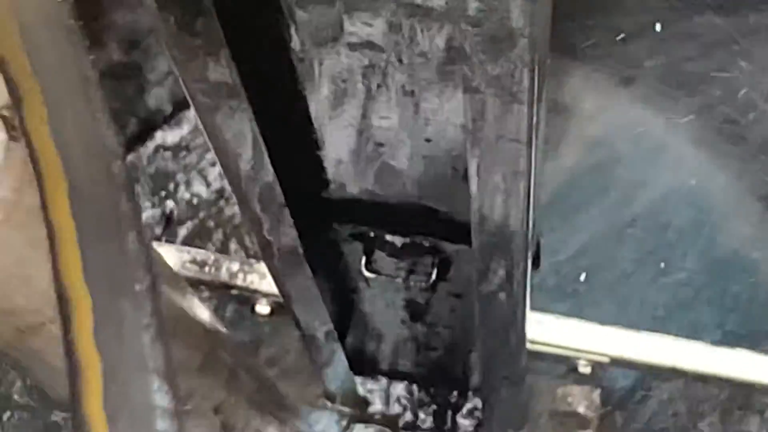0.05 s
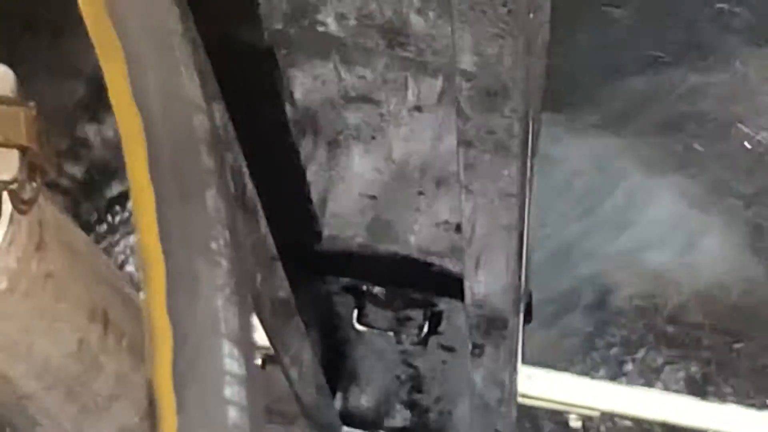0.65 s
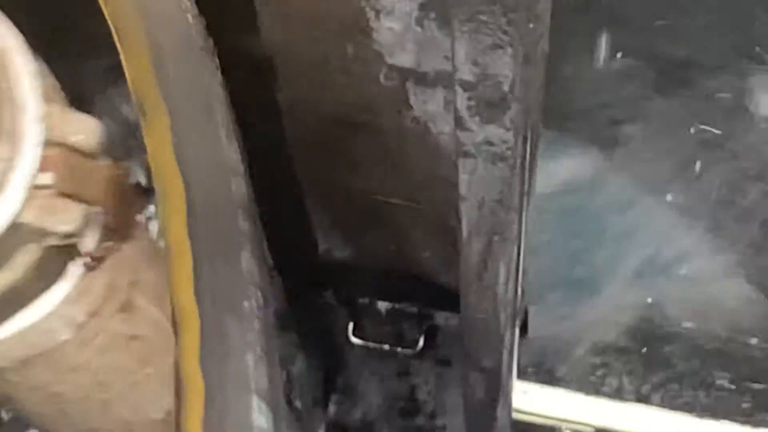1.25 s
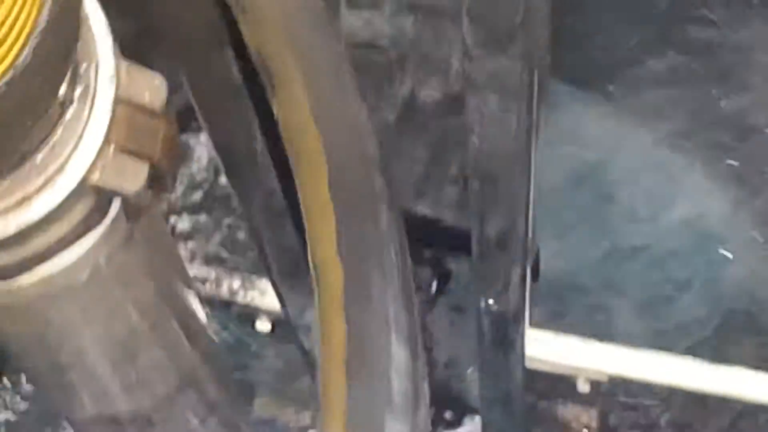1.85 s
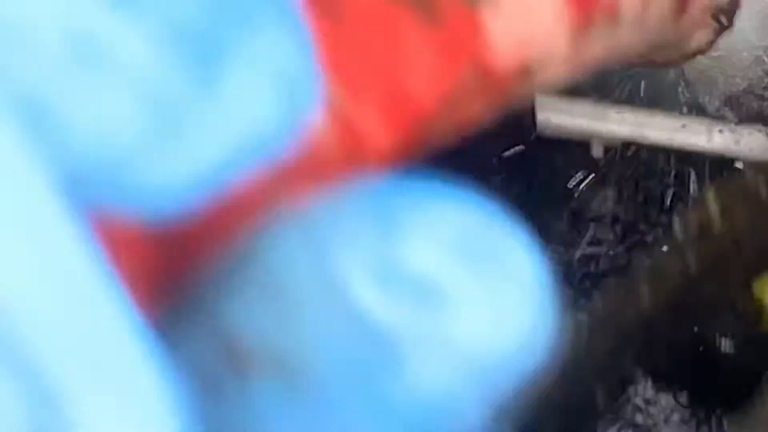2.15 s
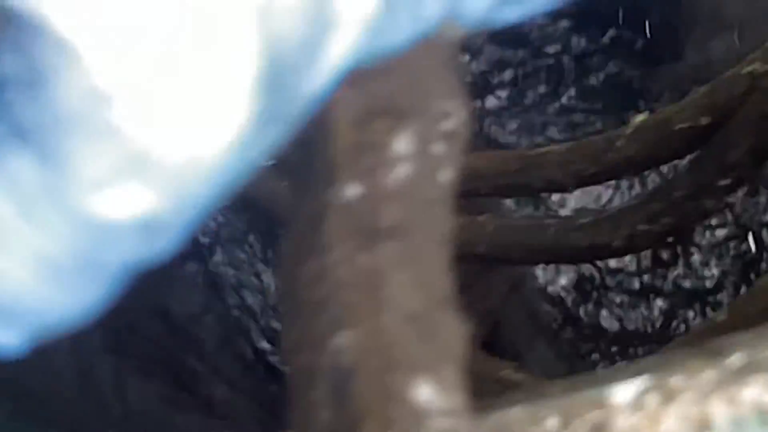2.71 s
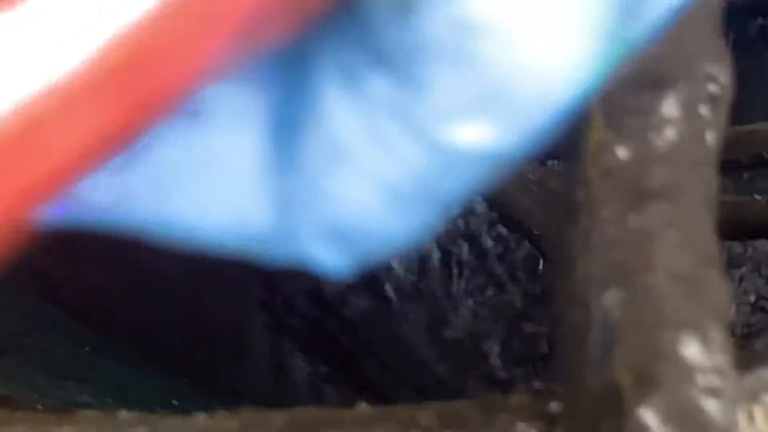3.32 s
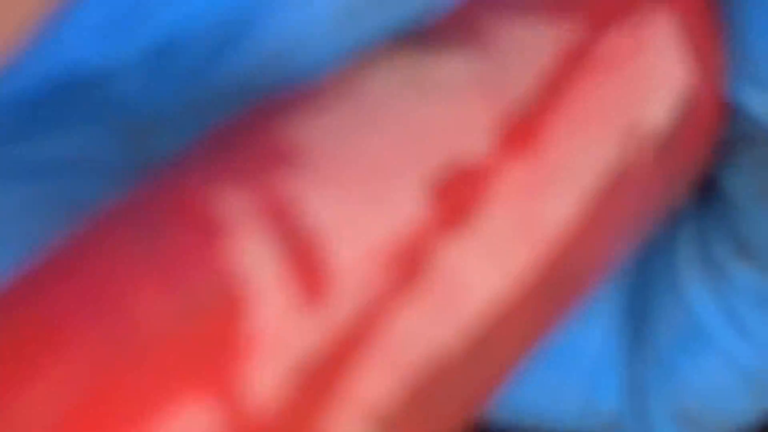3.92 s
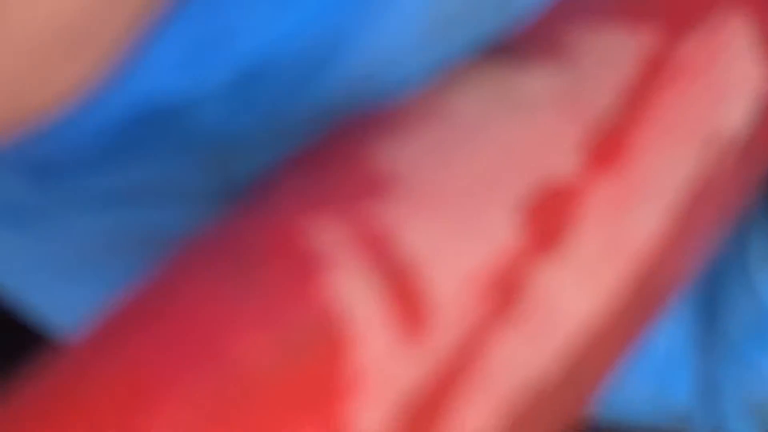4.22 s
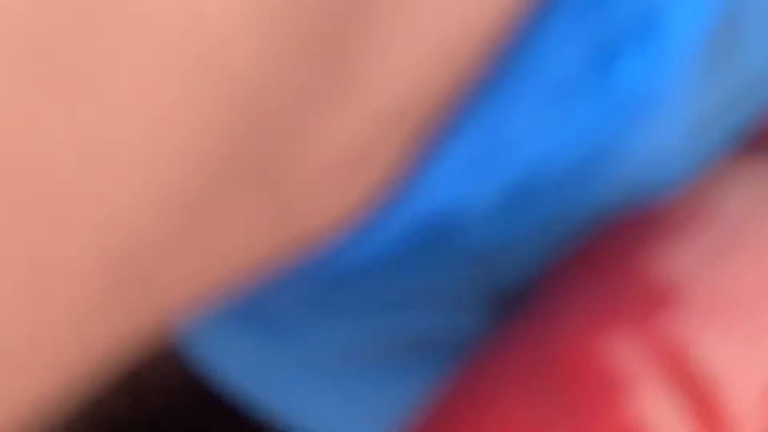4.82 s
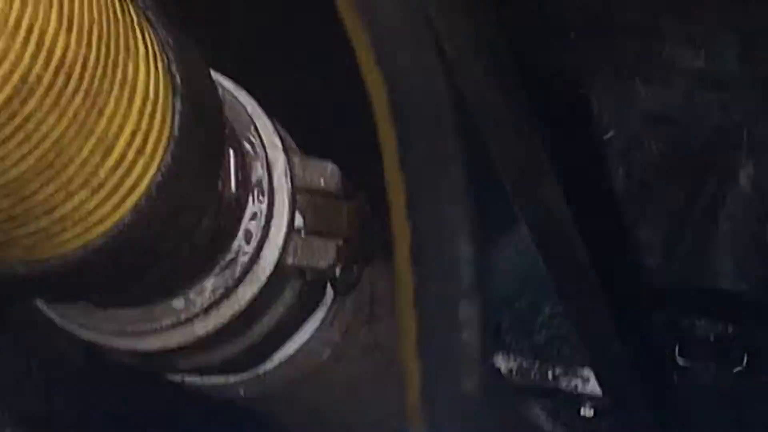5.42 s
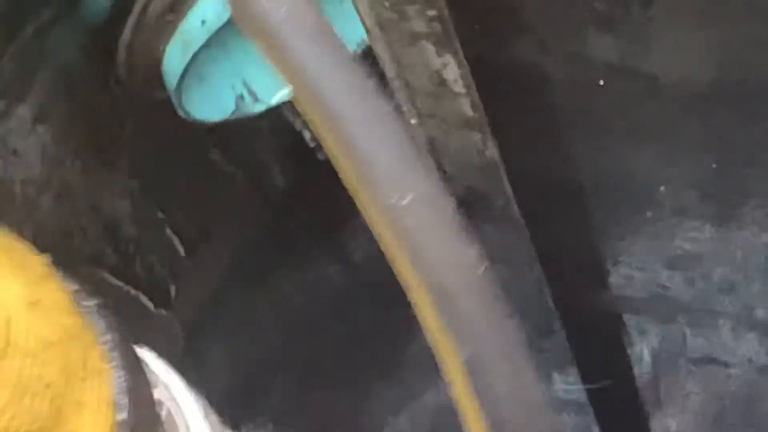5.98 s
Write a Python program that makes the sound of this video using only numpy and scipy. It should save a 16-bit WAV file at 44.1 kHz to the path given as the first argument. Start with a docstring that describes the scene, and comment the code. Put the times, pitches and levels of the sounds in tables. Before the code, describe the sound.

An engine-driven pump drones and rumbles steadily at an outdoor pit while its hose pours water into the pool below. A loud splashing surge with bright spray comes first, followed by quieter churning broken by short spurts and a few close drips. A second, longer surge turns hollow under a hand cupping the close microphone, then falls back. The shifting grip makes occasional dull bumps.

```python
"""At a steel-walled pit outdoors, an engine-driven pump empties through a hose.
The gush rings in the pit and is heard to swell twice and sink between; fine spray hisses above it.
The engine hums over a deep rumble. A gloved hand shifts its grip and cups the microphone,
whose two ports (its left and right openings) hear the spray a moment apart."""
import sys
import numpy as np
from scipy import signal
from scipy.fft import rfft, irfft, next_fast_len
from scipy.io import wavfile

SR = 44100
rng = np.random.default_rng(int(sys.argv[2]) if len(sys.argv) > 2 else 0)


def dump_mix(stems):
    """Bounce the given channels to the path in sys.argv[1] as a 16-bit WAV at rate SR."""
    frames = np.atleast_2d(stems).T  # one column per channel
    limited = np.clip(frames, -1, 1)  # hard clip at full scale
    pcm = np.round(limited * 32767).astype(np.int16)
    wavfile.write(sys.argv[1], SR, pcm)


N = 271215
TIME = np.arange(N) / SR
USUAL_GUSH_DB = -36


# The tone of water hitting the pool: pitch_hz, level_db
GUSH_SPECTRUM = [(150, -27), (350, -8), (500, -4.5), (870, -5.5), (965, -11.5), (1070, -3), (1450, -2),
                 (2100, -2), (2600, -3.5), (2850, -4), (3150, -7), (3450, -10), (3800, -15.5), (5000, -22),
                 (6000, -27), (7700, -27.5), (10000, -43)]

def gush(turns, gush_db, slug_db, cover, surge_db=0.81, throb=0.038):
    """The jet hits the pool: impacts, bubbles and ringing walls surge and throb with the pump."""
    # A quiet gush has a larger share of gurgle and splash, and the pool always sloshes.
    above_usual_db = gush_db - USUAL_GUSH_DB
    slosh_gain = from_db(-46.5 - gush_db - slug_db)
    gurgle_gain = np.hypot(from_db(2.0 - 0.33 * above_usual_db - 0.032 * slug_db), slosh_gain)
    splash_gain = from_db(2.1 - 0.079 * above_usual_db - 0.3 * slug_db - 10 * cover)  # the hand dulls it
    impacts = coloured(drops(per_s=9000, spread_db=1.5), GUSH_SPECTRUM)
    gurgle = filtered(impacts, lambda hz: 1 / (1 + (hz / 970) ** 10))  # the lows
    splash = filtered(impacts, lambda hz: 1 - 1 / (1 + (hz / 3200) ** 10))  # the highs
    rush = impacts - gurgle - splash
    water = from_db(-0.93 + drift(19)) * rush + from_db(-4.5) * pit_ringing()
    water += from_db(-13) * bubbles(per_s=160, cycles=88, size_count=22)
    water += gurgle_gain * from_db(2.0 * drift(39)) * gurgle
    water += splash_gain * from_db(1.6 * drift(30)) * splash
    pulsing = 1 + throb * (np.cos(4 * np.pi * turns) + np.cos(12 * np.pi * turns))
    return water * from_db(gush_db + slug_db + surge_db * drift(13)) * pulsing


# How loud the gush sounds: time_s, level_db
GUSH_LEVEL = [(0.0, -31), (0.05, -35), (0.22, -21.5), (0.32, -21.5), (0.53, -19.4), (0.67, -25.3),
              (0.78, -31), (0.87, -30.5), (1.04, -47), (1.55, -46), (1.9, -50.5), (2.19, -44.5),
              (2.46, -47.5), (3.19, -45.5), (3.35, -56), (3.74, -42), (3.81, -34), (4.39, -29.8),
              (4.48, -24), (4.66, -27), (4.78, -28.5), (5.04, -31.5), (5.16, -35.5), (5.28, -29.5),
              (5.42, -29.8), (5.55, -48.5), (6.15, -50.5)]

def gush_level():
    """The rush swells twice and sinks between; gives the level in dB."""
    return in_time(GUSH_LEVEL)


# Slugs, the sudden lumps of water in the stream: peak_s, rise_s, fall_s, gush_lift_db, spray_lift_db
WATER_SLUGS = [(0.505, 0.051, 0.05, 3, 0), (0.925, 0.033, 0.036, 6.5, 0.5), (1.03, 0.02, 0.025, -1, 5),
               (1.271, 0.048, 0.038, 16, 9.5), (1.37, 0.037, 0.085, 7, 0), (2.265, 0.026, 0.038, -0.5, 9),
               (2.348, 0.025, 0.03, 3.5, 10.5), (2.625, 0.0054, 0.021, 9.5, 1),
               (2.745, 0.054, 0.07, 12.3, 2), (2.87, 0.015, 0.07, 6, -2), (3.078, 0.0068, 0.043, 7.5, -1),
               (3.133, 0.007, 0.031, 2, 0), (3.218, 0.026, 0.034, 11.5, 4.5), (3.24, 0.0029, 0.014, 8.5, 7),
               (4.95, 0.035, 0.07, 3, 0), (5.402, 0.05, 0.019, 4.4, 0), (5.812, 0.037, 0.024, 14.5, 2)]

def slugs():
    """Each slug swells and passes; gives the lift of the gush and of the spray, in dB."""
    lifts_db = np.zeros((2, N))
    for peak_s, rise_s, fall_s, gush_lift_db, spray_lift_db in WATER_SLUGS:
        width_s = np.where(TIME < peak_s, rise_s, fall_s)
        swell = np.exp(-((TIME - peak_s) / width_s) ** 2)
        lifts_db += np.outer([gush_lift_db, spray_lift_db], swell)
    return lifts_db


# The notes at which the pit and the hose coupling ring: pitch_hz, width_hz, level_db
PIT_NOTES = [(647, 66, -4), (1053, 51, -2.5), (1208, 72, 3.5), (1312, 39, 1.5), (1389, 79, 4.5),
             (1471, 69, 1.5), (1601, 62, 0), (1782, 70, -2), (2046, 46, 5.5), (2190, 55, -1), (2497, 70, 1),
             (3360, 240, -12.5)]

def pit_ringing(swell_db=2.7, slide_share=0.012, heaves_per_s=4.0):
    """Churning water keeps each note ringing at random; it swells and slides as the water heaves."""
    ringing = 0
    for pitch_hz, width_hz, level_db in PIT_NOTES:
        sliding_hz = pitch_hz * (1 + slide_share * drift(heaves_per_s))
        phase = 2 * np.pi * np.cumsum(sliding_hz) / SR
        cos, sin = np.cos(phase), np.sin(phase)
        ring = np.array([drift(width_hz / 2) * cos + drift(width_hz / 2) * sin for _ in range(2)])
        ringing += from_db(level_db + swell_db * drift(heaves_per_s)) * ring
    return rms_one(ringing)


def bubbles(per_s, cycles, size_count):
    """Trapped air rings briefly, each bubble at the pitch of its size."""
    births = drops(per_s, spread_db=-1.0)
    sizes = rng.integers(0, size_count, N)
    pitches_hz = np.geomspace(1100, 2500, size_count)
    rings = (resonance(births * (sizes == k), hz, 2 * hz / cycles) for k, hz in enumerate(pitches_hz))
    return rms_one(sum(rings))


# Echoes off the near walls: delay_s, gain
WALL_ECHOES = [(.0034, .15), (.0057, -.16), (.0083, .14)]

def off_walls(pair, wander_s=0.0003, wanders_per_s=1.2):
    """Short echoes wander as the microphone moves, giving the water a shifting, hollow tone."""
    echoed = pair.copy()
    for delay_s, gain in WALL_ECHOES:
        sent_s = TIME - delay_s - wander_s * drift(wanders_per_s)
        echoed += gain * np.array([np.interp(sent_s, TIME, stream) for stream in pair])
    return echoed


# Short, bright smacks of water at the peak of the first swell: start_s, relative_db
POOL_SLAPS = [(0.481, -29), (0.495, -22), (0.51, -25), (0.518, -26.5), (0.566, -27)]

def slaps(gain_db, low_hz, high_hz, decay_s):
    """Water smacks on water: short, bright bursts of dense impacts."""
    band = signal.butter(5, [low_hz, high_hz], "band", fs=SR, output="sos")
    bursts = dying(impulses(POOL_SLAPS), decay_s) * drops(per_s=9900, spread_db=1.0)
    return from_db(gain_db) * signal.sosfilt(band, bursts)


# How loud the fine spray sounds: time_s, relative_db
SPRAY_LEVEL = [(0.0, -31), (0.43, -30.5), (0.54, -34), (0.9, -34.5), (0.97, -48), (1.18, -50.5),
               (1.52, -45), (1.62, -47.5), (2.09, -51), (2.66, -52.5), (2.85, -43), (3.0, -43.5),
               (3.19, -52), (3.3, -34.5), (4.16, -35), (4.45, -39.5), (4.74, -34), (4.95, -38.5),
               (5.1, -33.5), (5.41, -33), (5.54, -42.5), (5.94, -37), (6.15, -40)]
# The tone of the bright hiss as heard, starting sharply at 8 kHz: pitch_hz, level_db
HISS_SPECTRUM = [(5000, -37), (7700, -38), (8050, 3), (8800, -1), (10300, 1.5), (11500, -1), (13000, -6),
                 (14100, -17), (15500, -15)]

def spray(slug_db, gain_db, flutter_db, mist_flutter_db):
    """Countless tiny droplets make a hiss; the finest mist flutters by itself."""
    hiss = coloured(drops(per_s=22000, spread_db=2.0), HISS_SPECTRUM)
    mist = filtered(hiss, lambda hz: 1 / (1 + (11500 / hz) ** 20))
    hiss = hiss - mist + mist * from_db(mist_flutter_db * drift(14))
    return from_db(in_time(SPRAY_LEVEL) + slug_db + gain_db + flutter_db * drift(13.5)) * hiss


# How fast the engine spins: time_s, turns_per_s
ENGINE_SPEED = [(0, 54.46), (0.6, 54.38), (1.2, 54.0), (1.7, 54.03), (2.1, 54.32), (2.6, 54.49),
                (3.0, 54.67), (3.5, 54.06), (4.05, 54.47), (4.5, 54.24), (4.9, 53.92), (5.3, 54.12),
                (5.65, 54.33), (6.15, 54.42)]

def shaft_turns():
    """The shaft spins almost steadily; gives the count of turns so far."""
    return np.cumsum(in_time(ENGINE_SPEED)) / SR


# The main hum, at six times the shaft speed: time_s, relative_db
MAIN_HUM = [(0, -58), (0.2, -36), (0.3, -42), (0.5, -29.5), (0.85, -44), (1.0, -40), (1.23, -36),
            (1.5, -41.5), (1.9, -42), (2.08, -35), (2.28, -46), (2.5, -39.5), (2.78, -34.5), (3.0, -40),
            (3.23, -39.5), (3.3, -56), (4.2, -50), (4.57, -39), (5.15, -47.5), (5.5, -40), (5.9, -52.5),
            (6.15, -43.5)]
# A lower hum, at four times the shaft speed: time_s, relative_db
LOW_HUM = [(0, -54), (0.5, -37), (0.9, -70), (1.7, -60), (2.1, -45), (2.85, -38.5), (3.55, -51), (4.7, -52),
           (6.15, -53)]
# Weaker hums: speed_multiple, against_main_hum_db
WEAK_HUMS = [(2, -7), (12, -22)]

def engine(turns, gain_db, waver_db, waver_rad):
    """The engine hums at even multiples of its shaft speed, each tone wavering by itself."""
    main_db = in_time(MAIN_HUM)
    tones = [(4, in_time(LOW_HUM)), (6, main_db)]
    tones += [(multiple, main_db + db) for multiple, db in WEAK_HUMS]
    hum = 0
    for multiple, level_db in tones:
        strength = from_db(level_db + waver_db * drift(15))
        phase = 2 * np.pi * (multiple * turns + rng.random()) + waver_rad * drift(11)
        hum += strength * np.sin(phase)
    return np.sqrt(2) * from_db(gain_db) * hum


# How loud the pump's deep drone sounds: time_s, relative_db
DRONE_LEVEL = [(0, -34.5), (0.5, -27), (0.85, -50), (1.6, -35.5), (2.0, -33.5), (2.85, -33.5), (3.55, -57),
               (4.15, -35), (5.2, -47), (5.6, -37), (6.15, -33)]

def pump_drone(pitch_hz, gain_db, wander_rad):
    """The pump turns a little slower than the engine and booms, not quite steadily."""
    phase = 2 * np.pi * (pitch_hz * TIME + rng.random()) + wander_rad * drift(2.2)
    return np.sqrt(2) * from_db(in_time(DRONE_LEVEL) + gain_db) * np.sin(phase)


# The tone of the deep rumble: pitch_hz, level_db
RUMBLE_SPECTRUM = [(15, -18), (28, -13), (42, 0), (62, 3.5), (100, 1), (150, -4.5), (250, -10.5),
                   (400, -14), (700, -25), (1200, -87)]

def rumble(gush_db, roar_hz, roar_width_hz):
    """Water churns deep in the pump and the pit; the jet's rough, low roar swells with the gush."""
    churn_db = -33 + 0.011 * (gush_db - USUAL_GUSH_DB)  # almost steady
    churn = coloured(rng.standard_normal(N), RUMBLE_SPECTRUM)
    plunges = drops(per_s=400, spread_db=1.5)[0]
    roar = rms_one(double_resonance(plunges, roar_hz, roar_width_hz))
    return from_db(churn_db) * churn + from_db(gush_db - 18.5) * roar


# The gloved hand shifting its grip: start_s, relative_db
GRIP_BUMPS = [(0.929, -25), (1.269, -18), (2.749, -20), (3.129, -33), (3.238, -21), (4.13, -21),
              (5.479, -16)]

def grip_bumps(gain_db):
    """Each soft push on the microphone's housing makes a thud that dies within a few cycles."""
    pushes = impulses(GRIP_BUMPS)
    body = resonance(pushes, pitch_hz=75, width_hz=57)
    shell = from_db(-6) * resonance(pushes, pitch_hz=326, width_hz=68)
    thud = signal.sosfilt(signal.butter(2, 450, fs=SR, output="sos"), body + shell)
    return from_db(gain_db) * thud * pushes.max() / np.abs(thud).max()


# Single drops that land close by: start_s, relative_db
NEAR_DROPS = [(1.022, -25), (1.051, -32), (1.063, -34), (3.046, -30)]

def drop_ticks(gain_db, pitch_hz, width_hz):
    """Each drop ticks on the housing and scatters into a brief patter."""
    hits = impulses(NEAR_DROPS)
    patter = from_db(-18) * dying(hits, decay_s=0.0016) * drops(per_s=14000, spread_db=-1.0)[0]
    tick = double_resonance(hits + patter, pitch_hz, width_hz)
    return from_db(gain_db) * tick * hits.max() / np.abs(tick).max()


def whistle(pitch_hz, width_hz, peak_s, peak_db, fade_db_per_s):
    """Swirling water in the hose coupling sounds one faint note that swells and fades."""
    level_db = peak_db - fade_db_per_s * np.abs(TIME - peak_s)
    return from_db(level_db) * rms_one(double_resonance(rng.standard_normal(N), pitch_hz, width_hz))


# The hand closing over the microphone: time_s, cover_share
HAND_COVER = [(3.22, 0), (3.29, 1), (3.7, 0.5), (4.2, 0.66), (4.8, 0.74), (5.4, 0.53), (5.68, -0.5),
              (5.92, 0.54), (6.15, 0)]

def hand_cover():
    """How far the hand covers the ports, from 0 (open) to 1 (fully cupped)."""
    return np.clip(in_time(HAND_COVER), 0, 1)


# The hollow tone of the cupped hand: pitch_hz, gain_db
CUPPED_TONE = [(450, 2.5), (650, -0.5), (850, -0.5), (1040, 5.5), (1200, -1.5), (1400, 1.5), (1680, 4.5),
               (1890, -2.5), (2040, -3.5), (2300, -10), (2600, -5.5), (2950, -9), (3600, 1), (6000, 1.5),
               (10000, -0.5), (15000, -0.5)]

def under_hand(sound, cover):
    """The hollow of the hand colours the sound as far as it covers the ports."""
    cupped = filtered(sound, lambda hz: from_db(at_hz(CUPPED_TONE, hz)))
    return (1 - cover) * sound + cover * cupped


# How alike the two ports sound (1 is the same): pitch_hz, likeness_share
PORT_LIKENESS = [(900, 1), (1050, .9), (1400, .97), (2100, .94), (2450, .65), (2850, .95), (3200, .97),
                 (3800, .35), (4700, .6), (5500, .4), (6200, .995), (7600, 1), (9300, .98), (11600, .99),
                 (13000, .85), (15500, .95)]
# How much louder the left port is: pitch_hz, left_minus_right_db
PORT_BALANCE = [(500, 0), (1000, 0.1), (1600, 0.4), (2400, 1.2), (3200, 0.2), (4800, 0.8), (6500, 0)]
# How far ahead the wave is at the left port: pitch_hz, lead_rad
PORT_LEAD = [(0, 0), (960, 0), (1120, .7), (1220, -.4), (1550, -1.05), (2150, -.75), (2350, .5),
             (2600, 2.4), (2900, 3.1), (3850, 3), (4250, .4), (5300, .2), (5700, -.9), (6100, -3.14),
             (7650, -3.14), (7950, -4.4), (9040, -6.2), (9560, -6.4), (11250, -9.4), (12000, -9.45),
             (12400, -10), (13300, -12.4), (14900, -12.8), (15350, -15.6)]

def at_ports(pair):
    """A shared and an unshared stream become left and right, alike and in step in the bass."""
    def port_response(hz):
        sides = np.array([[0.5], [-0.5]])
        lead_rad = np.interp(hz, *np.transpose(PORT_LEAD))
        return from_db(sides * at_hz(PORT_BALANCE, hz)) * np.exp(1j * sides * lead_rad)
    shared = filtered(pair[0], lambda hz: np.sqrt((1 + at_hz(PORT_LIKENESS, hz)) / 2))
    unshared = filtered(pair[1], lambda hz: np.sqrt((1 - at_hz(PORT_LIKENESS, hz)) / 2))
    return filtered(np.array([shared + unshared, shared - unshared]), port_response)


def drops(per_s, spread_db):
    """Two unrelated streams of randomly timed impacts of uneven size."""
    sizes = from_db(spread_db * np.minimum(rng.exponential(1, (2, N)), 4))
    signs = rng.choice([-1, 1], (2, N))
    landed = rng.random((2, N)) < per_s / SR
    return rms_one(sizes * signs * landed)


def impulses(rows):
    """One click for each row of start_s, level_db."""
    clicks = np.zeros(N)
    for start_s, level_db in rows:
        clicks[round(start_s * SR)] = from_db(level_db)
    return clicks


def dying(hits, decay_s):
    """Each click becomes a level that starts at its height and dies away."""
    return signal.lfilter([1], [1, -np.exp(-1 / (decay_s * SR))], hits + 1e-18)


def drift(per_s):
    """Smooth random wandering with a typical size of one."""
    step, warm_up = 40, 2000
    pole = np.exp(-2 * np.pi * step * per_s / SR)
    noise = rng.standard_normal(N // step + warm_up + 2)
    slow = signal.lfilter([1], [1, -2 * pole, pole * pole], noise)[warm_up:]
    return np.interp(np.arange(N) / step, np.arange(len(slow)), rms_one(slow))


def resonance(sound, pitch_hz, width_hz):
    """Ring at one pitch; the narrower the width, the longer the ring."""
    pole = np.exp(-np.pi * width_hz / SR)
    feedback = [1, -2 * pole * np.cos(2 * np.pi * pitch_hz / SR), pole * pole]
    return signal.lfilter(np.array([1, 0, -1]) * (1 - pole * pole) / 2, feedback, sound + 1e-18)


def double_resonance(sound, pitch_hz, width_hz):
    """Two resonances in a row let less through away from their pitch."""
    return resonance(resonance(sound, pitch_hz, width_hz), pitch_hz, width_hz)


def filtered(sound, response):
    """Turn each pitch up or down by response(hz)."""
    size = next_fast_len(N + 4096, real=True)
    hz = np.maximum(np.arange(size // 2 + 1) * SR / size, 1)
    return irfft(rfft(sound, size) * response(hz), size)[..., :N]


def coloured(sound, spectrum):
    """Give a sound the tone in a table, at an average strength of one."""
    return rms_one(filtered(sound, lambda hz: from_db(at_hz(spectrum, hz))))


def at_hz(rows, hz):
    """Read a table at any pitch, with octaves evenly spaced."""
    pitches_hz, values = np.transpose(rows)
    return np.interp(np.log(hz), np.log(pitches_hz), values)


def in_time(rows):
    """Read a table of time_s, value at every sample."""
    return np.interp(TIME, *np.transpose(rows))


def from_db(db):
    """Decibels to gain."""
    return 10 ** (np.asarray(db) / 20)


def rms_one(sound):
    """Scale to an average strength (rms) of one."""
    return sound / np.sqrt(np.mean(sound ** 2) + 1e-20)


def scene():
    """Water reaches the two ports differently; the low sounds are the same in both."""
    turns, gush_db, cover = shaft_turns(), gush_level(), hand_cover()
    slug_gush_db, slug_spray_db = slugs()
    jet = gush(turns, gush_db, slug_gush_db, cover)
    hiss = spray(slug_spray_db, gain_db=3.0, flutter_db=0.9, mist_flutter_db=1.1)
    water = at_ports(off_walls(jet) + hiss + slaps(gain_db=1.0, low_hz=4040, high_hz=5340, decay_s=0.01))
    water += whistle(pitch_hz=2310, width_hz=30, peak_s=2.36, peak_db=-53.5, fade_db_per_s=17)
    low = engine(turns, gain_db=-1.43, waver_db=2.5, waver_rad=0.22)
    low += pump_drone(pitch_hz=52.35, gain_db=-3.0, wander_rad=0.3)
    low += rumble(gush_db, roar_hz=190, roar_width_hz=193)
    knocks = grip_bumps(gain_db=-4.5) + drop_ticks(gain_db=-3.5, pitch_hz=10200, width_hz=1500)
    return under_hand(water, cover) + low + knocks


def record(dry):
    """The highest treble is cut off steeply."""
    cutoff_hz = 15750
    return filtered(dry, lambda hz: 1 / np.sqrt(1 + (hz / cutoff_hz) ** 500))


dry = scene()
out = record(dry)
dump_mix(out)
```